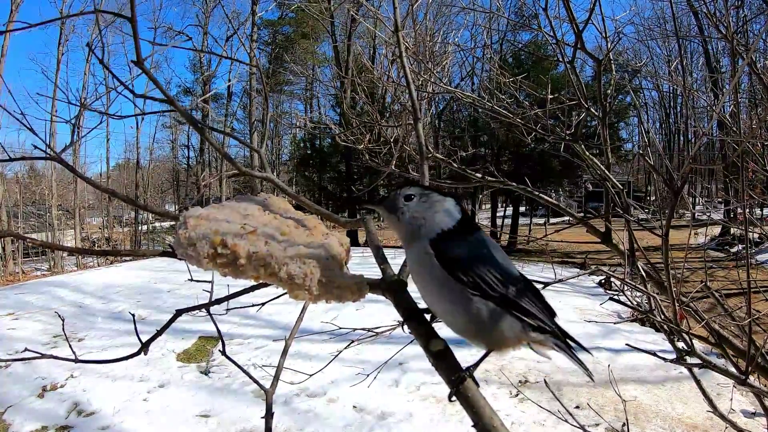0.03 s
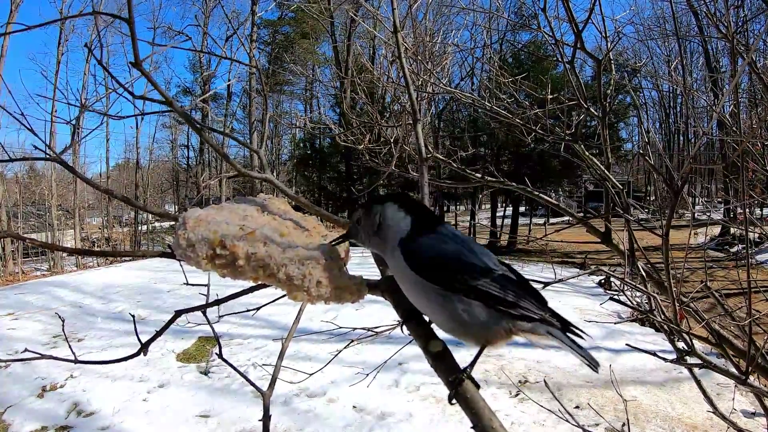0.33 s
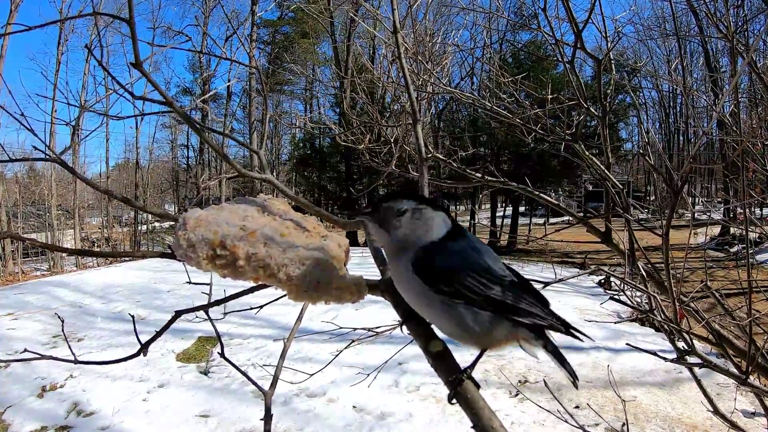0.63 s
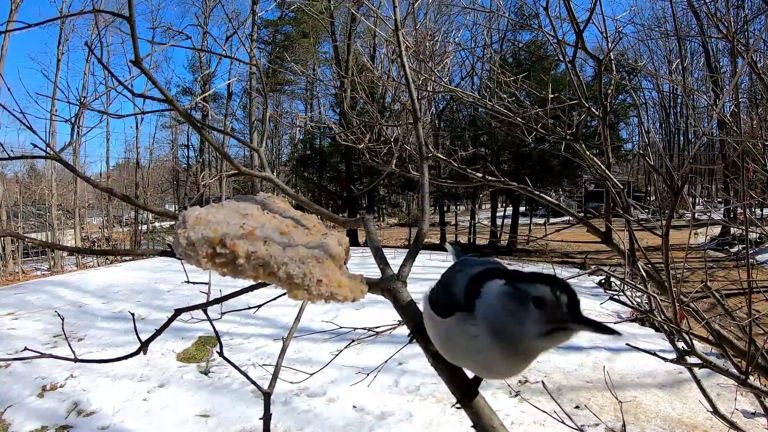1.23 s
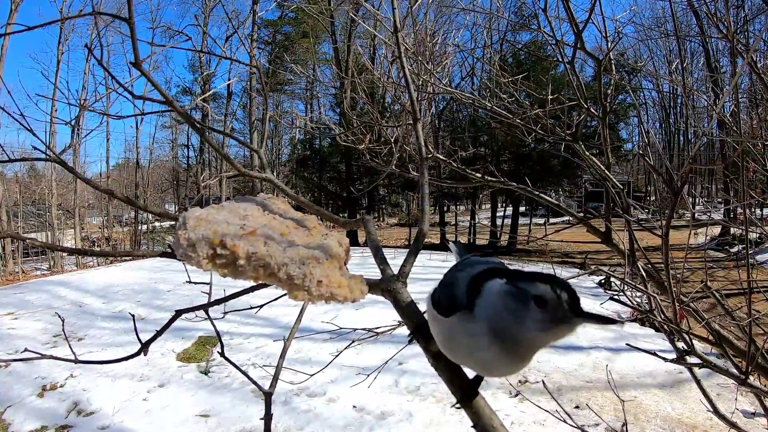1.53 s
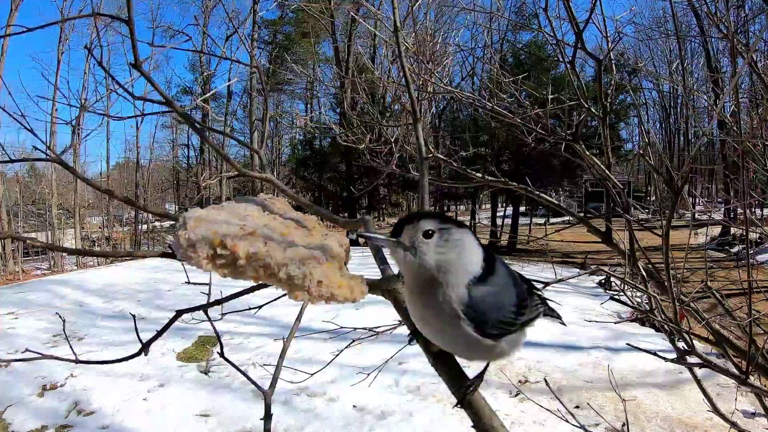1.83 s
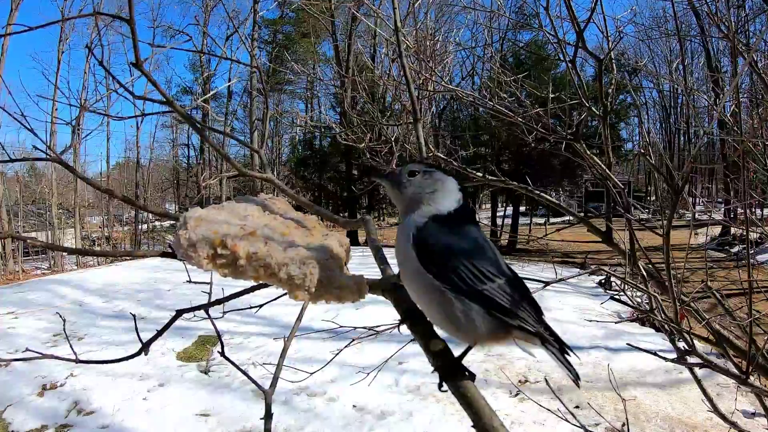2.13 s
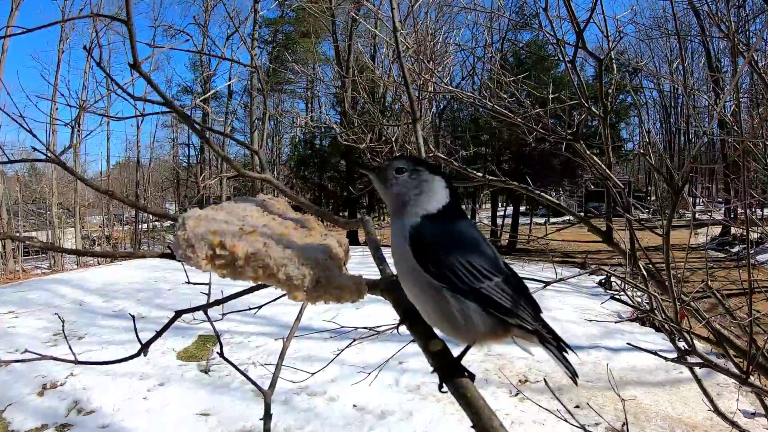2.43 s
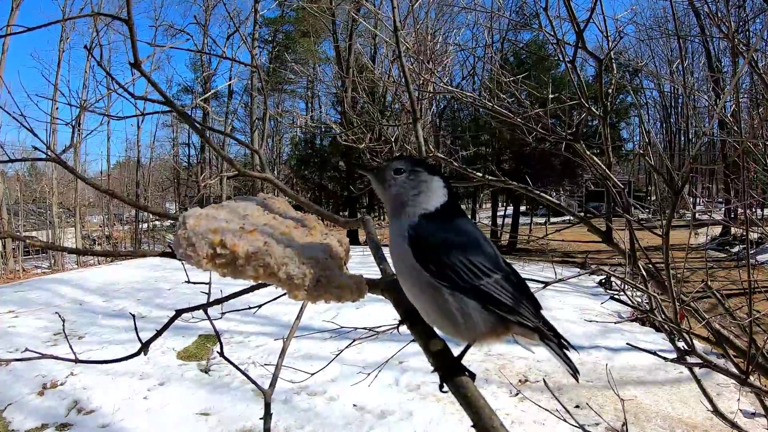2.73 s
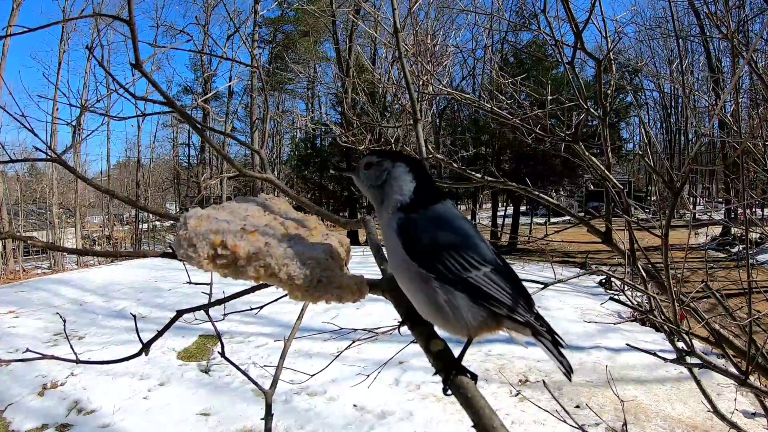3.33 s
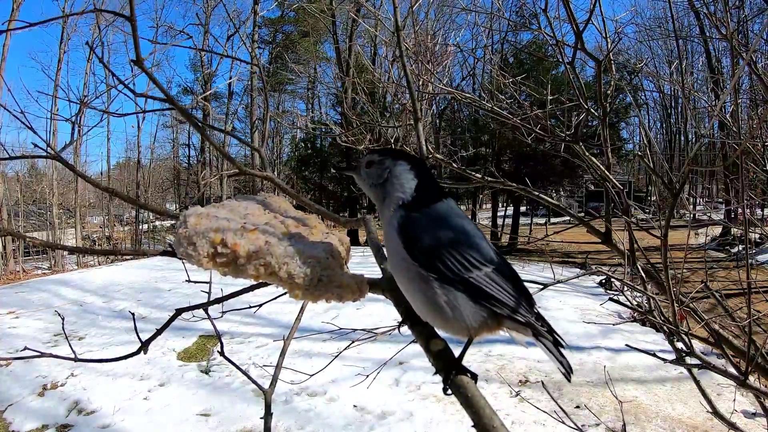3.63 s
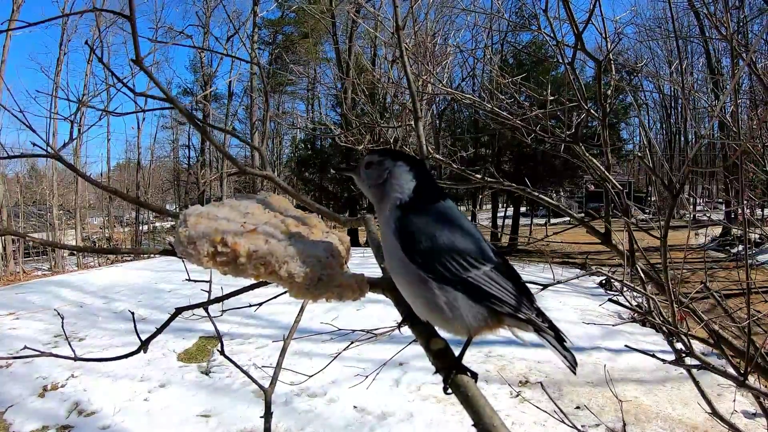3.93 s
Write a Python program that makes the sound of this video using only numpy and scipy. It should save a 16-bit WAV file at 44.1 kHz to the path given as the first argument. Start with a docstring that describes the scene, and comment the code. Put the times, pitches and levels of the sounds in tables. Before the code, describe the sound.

A nuthatch gives one short nasal call over low wind rumbling on the microphone.

```python
"""Wind rumbles and buffets at the microphone over a steady outdoor hiss. Then a nuthatch on a close branch
gives one short nasal note; it also ticks faintly as it feeds, and thin, high bird notes sound far off.
The note is a harmonic series from the syrinx, filtered by throat and bill and scattered by the trees.
The ticks are damped modes struck by bill and claws; the wind is turbulence, noise that swells in gusts."""
import sys
import numpy as np
from scipy import signal
from scipy.fft import rfft, irfft
from scipy.io import wavfile
from scipy.ndimage import uniform_filter1d

SR = 44100
rng = np.random.default_rng(int(sys.argv[2]) if len(sys.argv) > 2 else 0)


def to_wav(sig):
    """Store sig (one row per channel, or 1-D mono) as 16-bit WAV at the path in sys.argv[1].

    Samples outside -1..1 are clipped; the rate is SR.
    """
    pcm = np.clip(np.atleast_2d(sig), -1, 1) * 32767
    pcm = np.round(pcm).astype(np.int16)
    wavfile.write(sys.argv[1], SR, pcm.T)  # frames by channels


N = 176400

# contour of the nuthatch's note: t/s, f/Hz, level/dB
NOTE_CONTOUR = [(1.6894, 880, -42), (1.6917, 878, -30.5), (1.696, 906, -23), (1.702, 934, -21.5),
                (1.706, 915, -21.5), (1.7124, 915, -23), (1.7159, 857, -26), (1.719, 824, -32),
                (1.722, 820, -39.5)]
# responses of throat and bill, and of the echo from the trees: f/Hz, relative level/dB
THROAT_RESPONSE = [(900, -10.5), (1840, -4), (2720, -4), (3700, -4), (4600, -14.5), (5520, -26.5),
                   (6450, -38.5), (7400, -46), (9200, -60), (10150, -52), (11100, -57), (13000, -68)]
WOODS_RESPONSE = [(900, -17), (1800, -12), (2700, -8.5), (3700, -9.5), (4300, 5), (4650, -10), (5500, -11),
                  (9000, -17)]
# impacts of bill and claws: t/s, level/dB, time constant/s
TICK_IMPACTS = [(0.345, -41, 0.0005), (2.085, -54, 0.0009), (2.1574, -60, 0.0015)]
# modes they ring: nominal f/Hz, relative level/dB
TICK_MODES = [(1000, 4), (3150, 0), (3600, 3.5), (4100, -6), (5900, -9.5), (6400, -10), (7700, -11),
              (13000, -31)]
# spectra of the wind's three layers and of the hiss: f/Hz, relative spectral level/dB
RUMBLE_SPECTRUM = [(8, -21.5), (22, -5.5), (38, 1.5), (70, -3), (105, -6), (170, -14.5), (400, -35.5),
                   (1500, -62), (8000, -120)]
DRONE_SPECTRUM = [(60, -27.5), (115, -19), (150, -2), (173, 0), (203, -4), (240, -9), (320, -14),
                  (500, -25.5), (900, -63), (2500, -66), (8000, -120)]
RUSH_SPECTRUM = [(120, -5), (300, -3.5), (450, 1.5), (650, -3.5), (900, -12), (1400, -17.5), (3000, -41),
                 (7000, -66), (12000, -100)]
HISS_SPECTRUM = [(200, -11), (600, 5), (1000, -1), (1500, -0.5), (2200, -3.5), (2800, -4.5), (3600, -7.5),
                 (4400, -14.5), (5200, -19), (6000, -24), (6900, -25), (7750, -22.5), (8150, -30),
                 (8700, -36.5), (9700, -37), (10500, -33.5), (12000, -43.5), (14000, -50.5)]
# their envelopes: t/s, level/dB
RUMBLE_ENVELOPE = [(0, -41.5), (.45, -41), (.55, -45.5), (.85, -37), (1.0, -45.5), (1.62, -43.5),
                   (1.76, -39.5), (2.0, -39.5), (2.29, -36), (2.38, -51), (2.92, -41), (3.04, -55.5),
                   (3.27, -44), (3.64, -42.5), (3.71, -36.5), (4.0, -33.5)]
DRONE_ENVELOPE = [(0, -41), (.12, -50.5), (.18, -34.5), (.25, -45.5), (.42, -36), (.56, -51), (.66, -44),
                  (1.0, -50.5), (1.1, -40.5), (1.7, -35.5), (2.05, -45), (2.27, -34), (2.55, -39.5),
                  (2.92, -37.5), (3.1, -41.5), (3.5, -35.5), (3.74, -35.5), (4.0, -45.5)]
RUSH_ENVELOPE = [(0, -48), (.2, -50), (.42, -44.5), (.6, -48), (1.0, -48), (1.65, -49), (2.0, -49),
                 (2.3, -51), (2.8, -51), (3.3, -51), (3.7, -45), (4.0, -48.5)]
HISS_ENVELOPE = [(0, -53), (.5, -53), (1.1, -53), (2.0, -53.5), (3.0, -53), (4.0, -54.5)]
# eddies at the microphone: t/s, level at the crest/dB, Gaussian width/s, centre f/Hz
EDDIES = [(0.182, -27, 0.0048, 156), (0.371, -28, 0.0023, 149), (0.403, -36, 0.014, 139),
          (0.431, -33.5, .007, 221), (0.481, -34, 0.0079, 78.6), (0.661, -38.5, 0.0095, 78),
          (1.251, -39.5, 0.014, 147), (2.162, -34.5, 0.0054, 168), (2.247, -40, 0.013, 159),
          (2.281, -28.5, 0.0016, 172), (2.293, -27, 0.0025, 90), (2.336, -41, .002, 231),
          (2.415, -33.5, 0.0097, 158), (3.275, -34, 0.015, 184), (3.623, -32.5, 0.0067, 187),
          (3.674, -28, 0.0041, 173), (3.68, -22, 0.0024, 100), (3.711, -32, 0.0093, 75.4),
          (3.798, -33.5, 0.0044, 236), (3.837, -22.5, 0.002, 108)]
# distant whistles: t/s, duration/s, start f/Hz, end f/Hz, level/dB, rms waver/fraction of pitch
WHISTLES = [(0.724, 0.59, 2750, 2793, -70, 0.035), (2.52, .08, 7950, 8800, -87, .025),
            (2.57, .15, 8700, 8600, -92, .05), (2.598, 0.028, 7570, 6840, -74.5, .06),
            (2.622, 0.1, 8030, 7950, -75, 0.0087), (3.224, 0.074, 7600, 7870, -77, .02),
            (3.567, .055, 7900, 8150, -82, 0.0066), (3.628, .12, 8400, 8800, -91, 0.036),
            (3.664, .018, 7900, 6650, -74.5, .025)]


def nuthatch():
    """Source and filter: the syrinx's harmonics pass throat resonances that fall as the bill closes."""
    jitter, bill_fall = 0.0028, 0.06  # fractions of the pitch and of the resonance frequencies
    dull_per_octave, dull_above_hz = 1.4, 3000  # dB of treble lost for each dB that the effort drops
    rasp_db, onset_rasp_db, onset_s, fade_s = -42, -10, 0.0018, 0.00047
    times, pitch, level = np.transpose(NOTE_CONTOUR)
    t = np.arange(times[0], times[-1], 1 / SR)
    hz = np.interp(t, times, pitch) * (1 + jitter * drift(400)[:len(t)])
    db = np.interp(t, times, level)
    phase = 2 * np.pi * np.cumsum(hz) / SR
    harmonic = np.arange(1, 16)[:, None]
    octaves_above = np.log2(np.maximum(harmonic * hz / dull_above_hz, 1))
    dull_db = dull_per_octave * (db - db.max()) * octaves_above
    resonance_scale = 1 + bill_fall * np.linspace(.5, -.5, len(t))
    throat_db = level_at(THROAT_RESPONSE, harmonic * hz / resonance_scale)
    tone = unit_rms((amp(throat_db + dull_db) * np.cos(harmonic * phase)).sum(0))
    rasp = colour(rng.standard_normal(N), THROAT_RESPONSE)[:len(t)] * (1 + np.cos(phase))
    onset = (t - t[0]) / onset_s  # the voice is hoarse until the syrinx locks on
    hoarseness = amp(rasp_db) + amp(onset_rasp_db) * onset * np.exp(1 - onset)
    gate = np.sin(np.pi / 2 * np.clip(np.minimum(t - t[0], t[-1] - t) / fade_s, 0, 1)) ** 2
    note = np.zeros(N)
    add(note, times[0], gate * amp(db) * (tone + hoarseness * rasp))
    near_echo = amp(-24.5) * echoes(note, t60=0.09)
    tree_echo = amp(-31) * echoes(colour(note, WOODS_RESPONSE), t60=0.83)
    return note + near_echo + tree_echo


def feeding_ticks():
    """Impact excitation: each tiny snap at food or bark rings heavily damped modes."""
    t, out = np.arange(2048) / SR, np.zeros(N)
    for start, db, decay in TICK_IMPACTS:
        ring = sum(amp(mode_db) * np.sin(2 * np.pi * hz * rng.uniform(0.92, 1.02) * t)
                   for hz, mode_db in TICK_MODES)
        add(out, start, amp(db) * t / decay * np.exp(1 - t / decay) * ring)
    return out


def wind():
    """Turbulent flow: low rumble, hollow drone and rush swell with the gusts and flutter together."""
    patch_db, flutter_db = 1.5, 0.88
    rumble = patchy_noise(RUMBLE_SPECTRUM, RUMBLE_ENVELOPE, patch_db)
    drone = patchy_noise(DRONE_SPECTRUM, DRONE_ENVELOPE, patch_db)
    rush = patchy_noise(RUSH_SPECTRUM, RUSH_ENVELOPE, patch_db)
    return (rumble + drone + rush) * unit_rms(amp(flutter_db * drift(49)))


def buffets():
    """Pressure pulses: single eddies strike the microphone as soft thuds of low, band-limited noise."""
    width_octaves = 0.56
    t, hz, out = np.arange(N) / SR, np.fft.rfftfreq(N, 1 / SR), np.zeros(N)
    for crest_s, db, width_s, centre_hz in EDDIES:
        band = np.exp(-.5 * (np.log2((hz + 1) / centre_hz) / width_octaves) ** 2)
        pulse = np.exp(-.5 * ((t - crest_s) / width_s) ** 2)
        eddy = irfft(rfft(rng.standard_normal(N)) * band, N) * pulse
        out += amp(db) * eddy * np.linalg.norm(pulse) / np.linalg.norm(eddy)
    return out


def far_birds():
    """Frequency modulation: thin whistles glide and waver, blurred by scattering from the trees."""
    out = np.zeros(N)
    for start, length, start_hz, end_hz, db, waver in WHISTLES:
        progress = np.arange(0, length, 1 / SR) / length
        hz = (start_hz + (end_hz - start_hz) * progress) * (1 + waver * drift(300)[:len(progress)])
        whistle = np.sin(np.pi * progress) * np.sin(2 * np.pi * np.cumsum(hz) / SR)
        add(out, start, amp(db) * unit_rms(whistle))
    return out + amp(1) * echoes(out, t60=.35)


def outdoor_hiss():
    """Ambient noise: a broad, nearly stationary spectrum."""
    return patchy_noise(HISS_SPECTRUM, HISS_ENVELOPE, patch_db=-0.03)


def echoes(x, t60, delay_s=0.0036):
    """Reverberation: scattered reflections decay exponentially, by 60 dB in t60 seconds."""
    t = np.arange(SR) / SR
    tail = rng.standard_normal(SR) * amp(-60 * t / t60) * (t > delay_s)
    return signal.fftconvolve(x, tail / np.linalg.norm(tail))[:N]


def patchy_noise(spectrum, envelope, patch_db):
    """Random modulation: coloured noise follows an envelope and varies in time-frequency patches."""
    _, _, cells = signal.stft(rng.standard_normal(N), SR, nperseg=1024)
    patches = uniform_filter1d(rng.standard_normal(cells.shape), size=8, axis=0)
    patches = unit_rms(uniform_filter1d(patches, size=7, axis=1))
    noise = signal.istft(cells * amp(patch_db * patches), nperseg=1024)[1][:N]
    gain = amp(np.interp(np.arange(N) / SR, *np.transpose(envelope)))
    return gain * unit_rms(colour(noise, spectrum))


def drift(rate_hz):
    """Low-pass noise: a smooth fluctuation of rms 1."""
    hz = np.fft.rfftfreq(N, 1 / SR)
    return unit_rms(irfft(rfft(rng.standard_normal(N)) * np.exp(-(hz / rate_hz) ** 2), N))


def colour(x, spectrum):
    """Linear filtering that conserves the power of white noise."""
    gain = unit_rms(amp(level_at(spectrum, np.fft.rfftfreq(len(x), 1 / SR))))
    return irfft(rfft(x) * gain, len(x))


def level_at(spectrum, hz):
    """Interpolation of level on a log-frequency axis."""
    f, db = np.transpose(spectrum)
    return np.interp(np.log(hz + 1), np.log(f + 1), db)


def amp(db):
    """Decibels to amplitude ratio."""
    return 10 ** (np.asarray(db) / 20)


def unit_rms(x):
    """Normalisation to rms 1."""
    return x / np.sqrt(np.mean(x ** 2) + 1e-20)


def add(mix, start_s, sound):
    """Superposition of a sound from a given time."""
    part = mix[round(start_s * SR):][:len(sound)]
    part += sound[:len(part)]


def scene():
    """Superposition: birds, wind and hiss sum in one channel."""
    hiss = outdoor_hiss()
    return (nuthatch() + feeding_ticks() + far_birds() + wind() + buffets() + hiss)[None]


def record(dry):
    """Band limiting: a low-pass filter removes the highest treble."""
    cutoff_hz = 13900
    lowpass = signal.firwin(511, cutoff_hz, window=("kaiser", 9), fs=SR)
    return signal.oaconvolve(dry, lowpass[None], "same")


dry = scene()
out = record(dry)
to_wav(out)
```